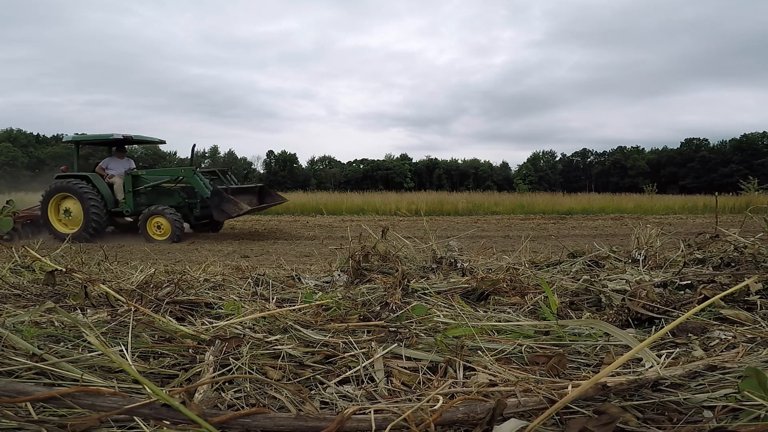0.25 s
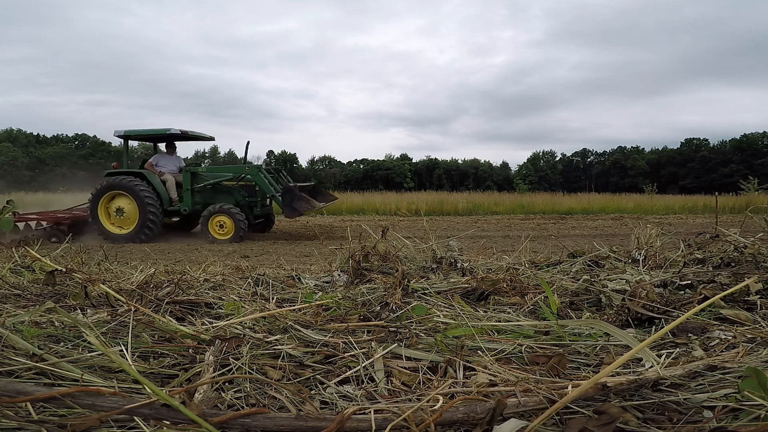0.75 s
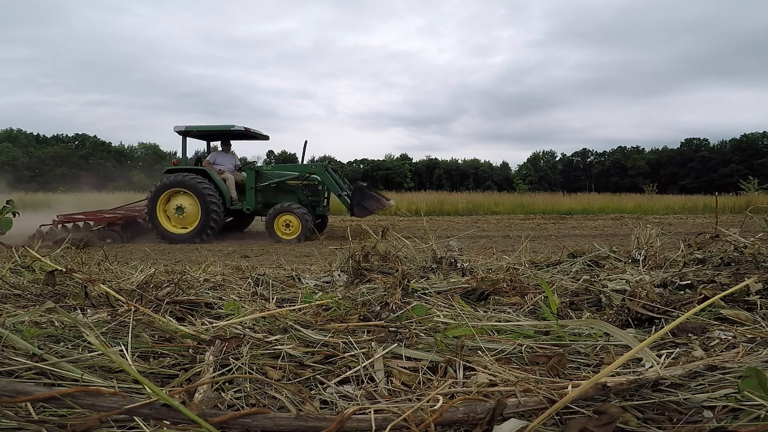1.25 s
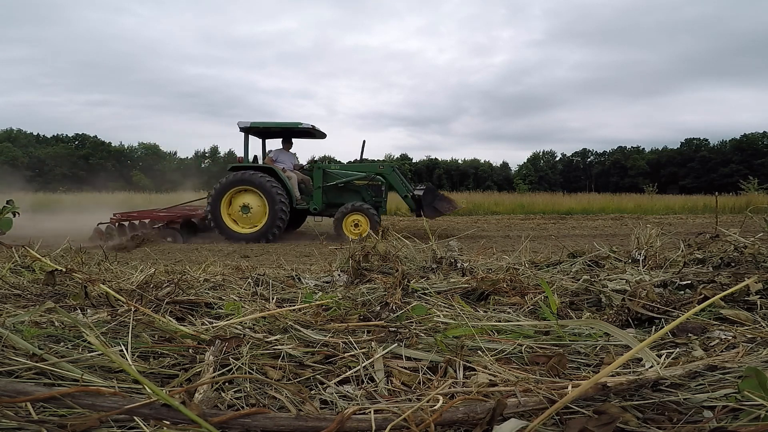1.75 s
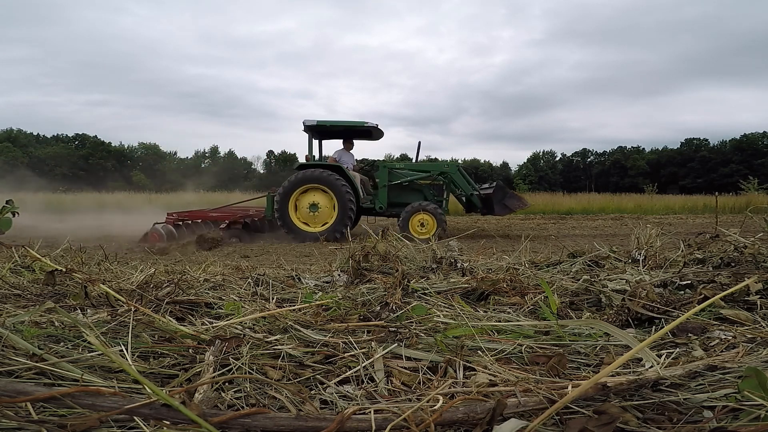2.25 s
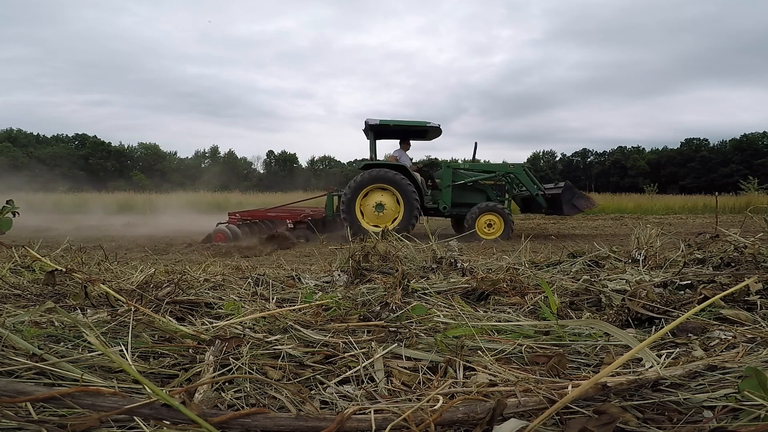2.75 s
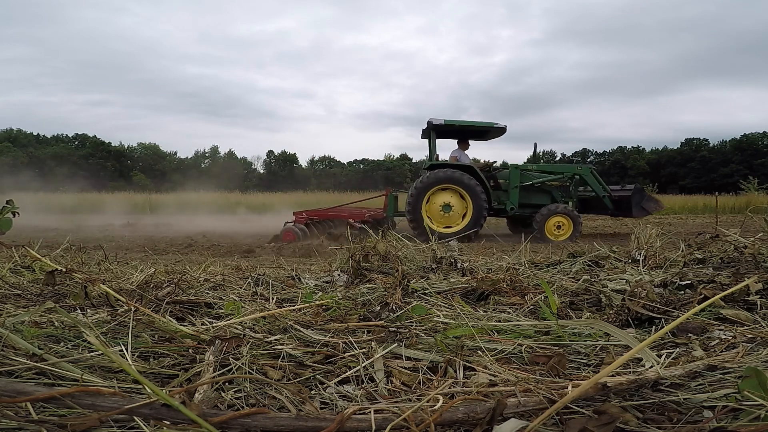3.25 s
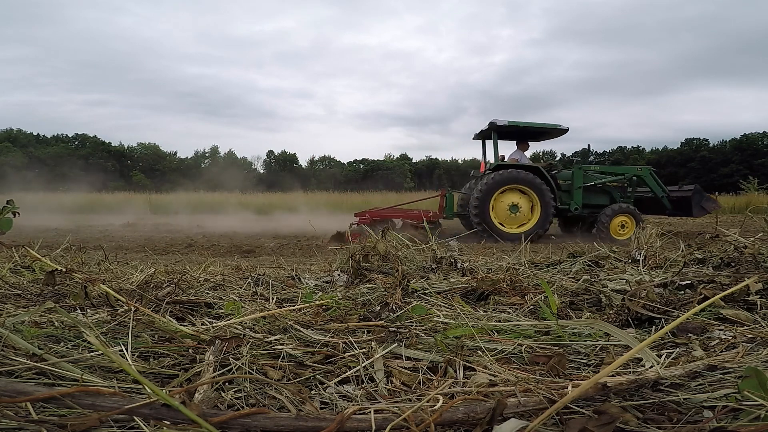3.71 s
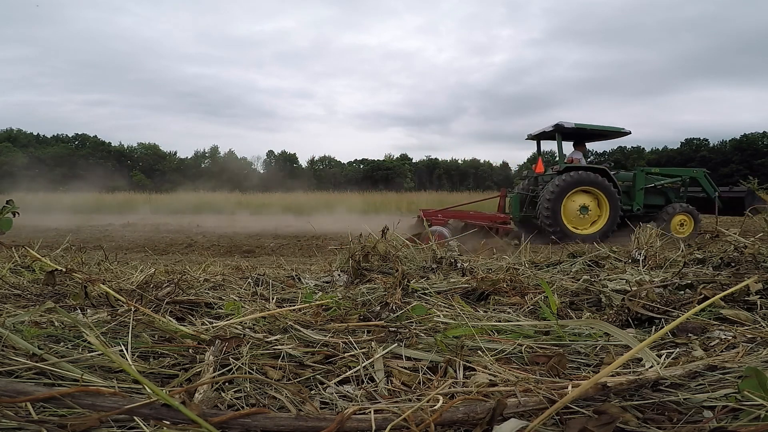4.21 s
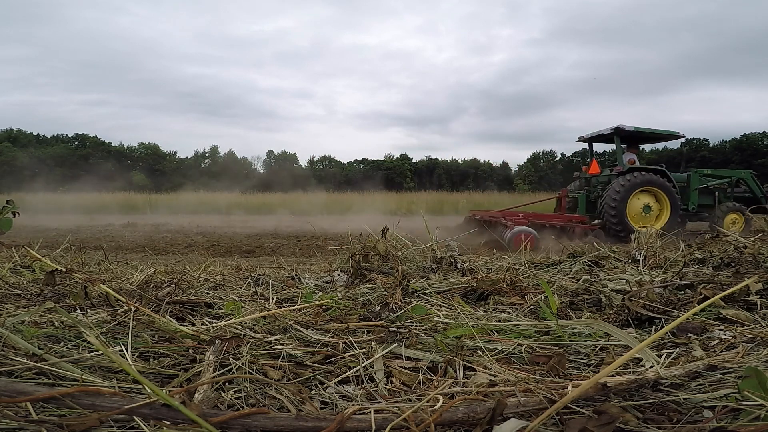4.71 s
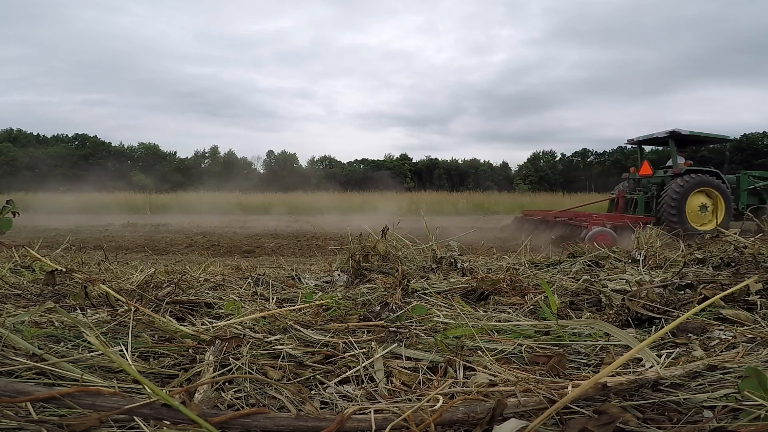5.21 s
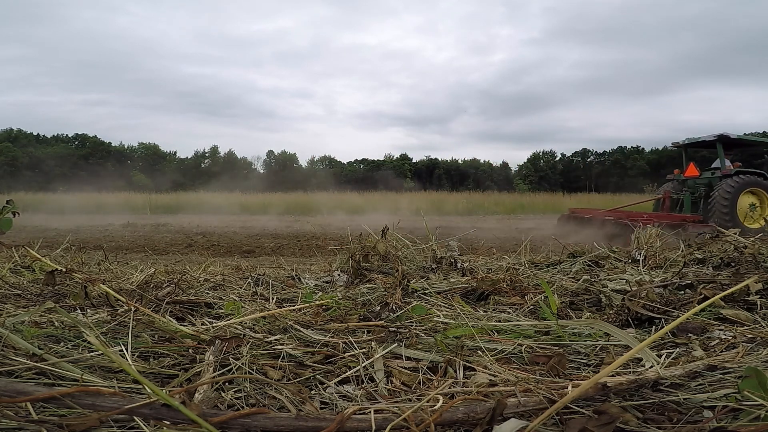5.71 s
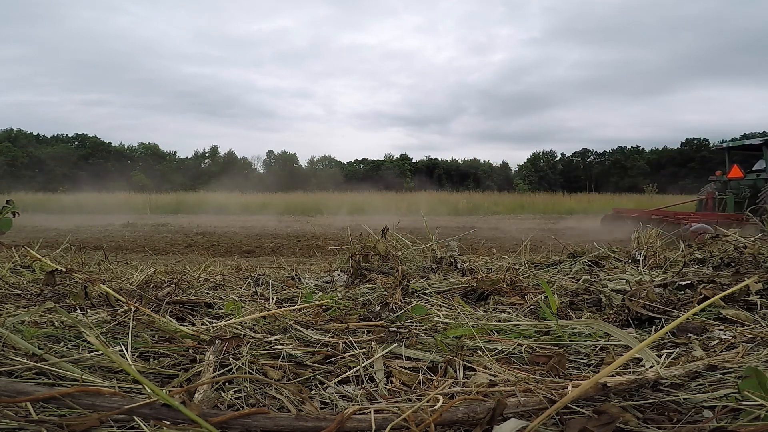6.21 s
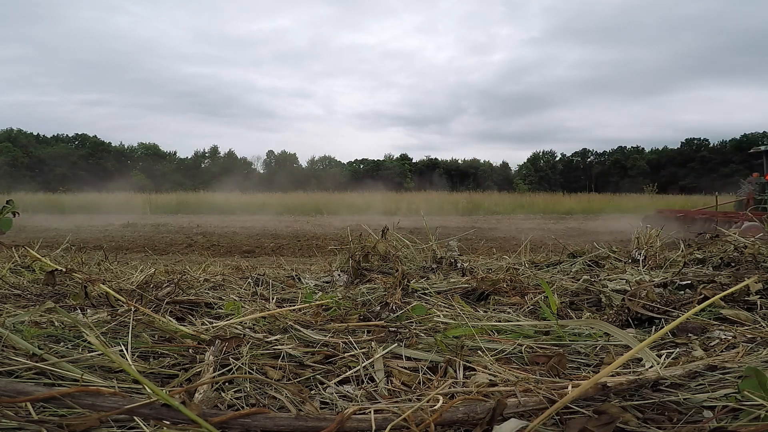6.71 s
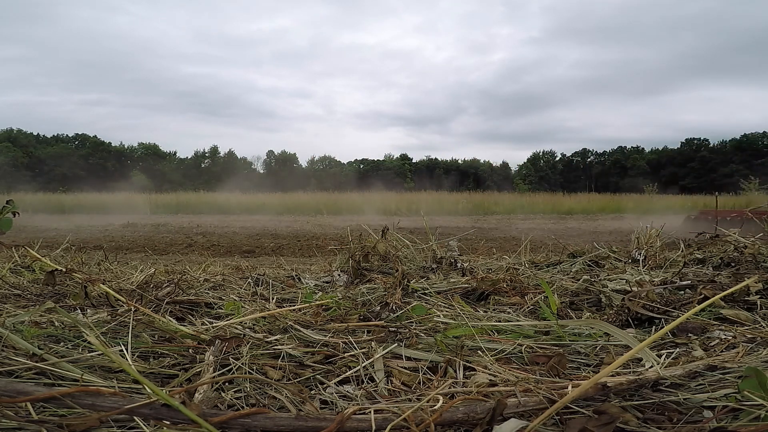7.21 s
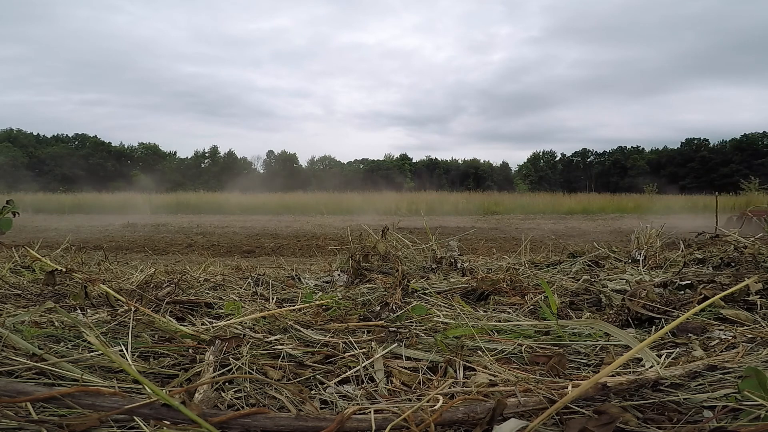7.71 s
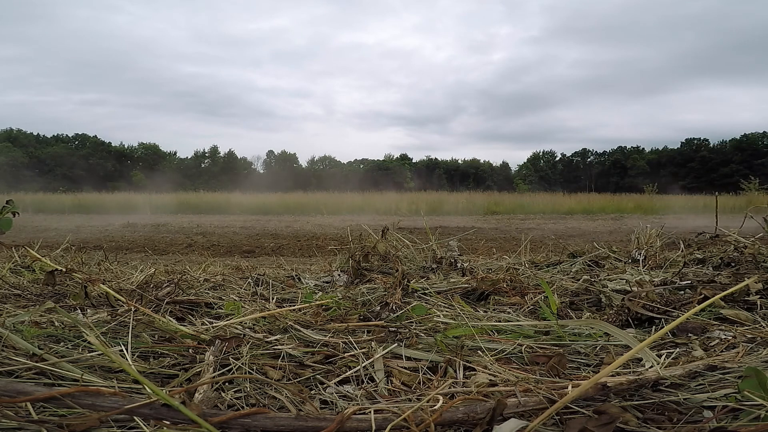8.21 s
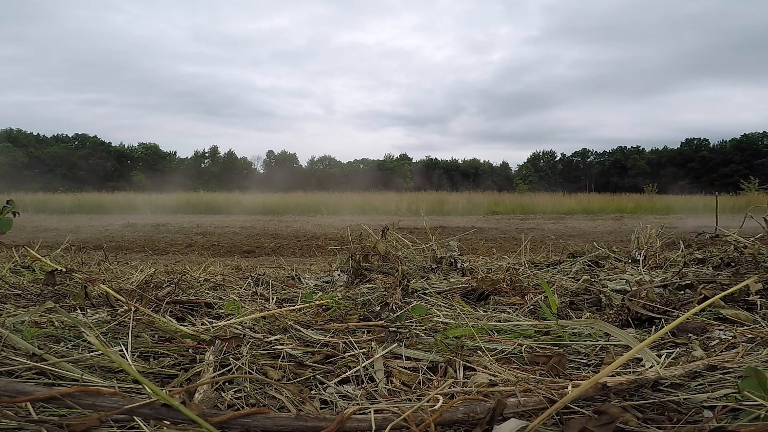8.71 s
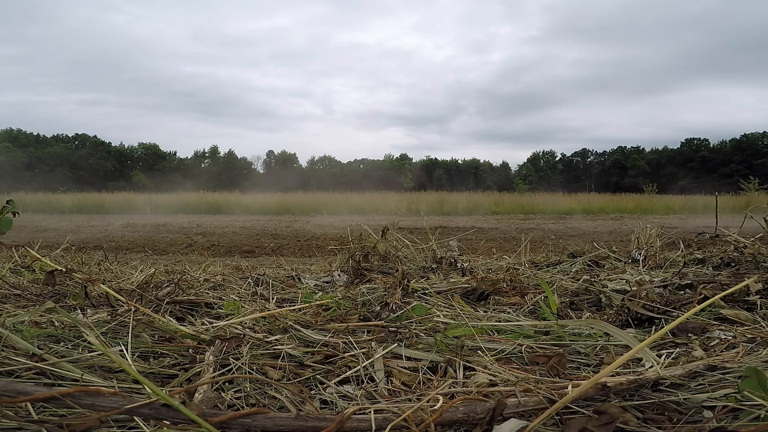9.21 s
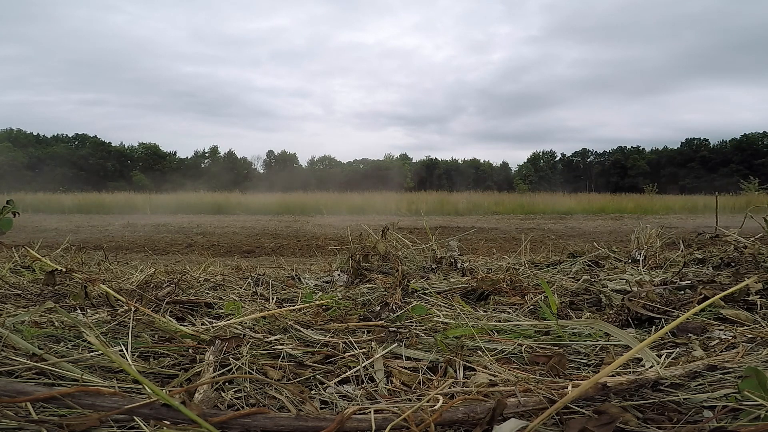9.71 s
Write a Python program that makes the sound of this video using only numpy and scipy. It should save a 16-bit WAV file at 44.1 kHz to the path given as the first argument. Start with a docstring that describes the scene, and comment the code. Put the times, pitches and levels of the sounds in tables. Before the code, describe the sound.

Close pass of a rattling four-cylinder tractor in an open field, gears whining, discs hissing, snapping stalks and squeaking as it drives away right.

```python
"""Tractor and disc harrow crossing a dry field

A four-cylinder diesel tractor passes from left to right and moves off, its pitch dropping a little.
The exhaust drones and throbs as sines locked to the engine cycle; noise in firing rhythm makes rumble,
growl, clatter and rasp. Gears whine as fluttering tones and loose steel guards ring when struck.
The discs hiss as a shower of random grains, snap stalks in short noise bursts and squeak in brief tones."""
import sys
import numpy as np
from scipy import signal
from scipy.fft import rfft, irfft, next_fast_len
from scipy.io import wavfile
from scipy.ndimage import uniform_filter1d, map_coordinates

SR = 44100
rng = np.random.default_rng(int(sys.argv[2]) if len(sys.argv) > 2 else 0)


def put_to_file(sound):
    """Save the sound as 16-bit audio at rate SR, in the file named by the first command-line argument."""
    columns = np.atleast_2d(sound).T  # one column per channel
    safe = np.clip(columns, -1, 1)
    whole_steps = np.round(safe * 32767)
    wavfile.write(sys.argv[1], SR, whole_steps.astype(np.int16))


N = 438779
T = np.arange(N) / SR   # time of every sample, seconds


def from_db(db):
    """Turn decibels into a gain."""
    return 10 ** (np.asarray(db) / 20)


def rms_one(x):
    """Scale to an average power of 1."""
    return x / np.sqrt(np.mean(x ** 2) + 1e-20)


def in_time(rows):
    """Draw straight lines through rows of (seconds, value), giving a value for every sample."""
    return np.interp(T, *np.transpose(rows))


def colour(x, spectrum):
    """Filter a sound by a table of (Hz, dB), then scale it to unit power."""
    hz, level_db = np.transpose(spectrum)
    size = next_fast_len(N)
    bins_hz = np.maximum(np.arange(size // 2 + 1) * SR / size, 1)
    bins_db = np.interp(np.log(bins_hz), np.log(hz), level_db,
                        left=level_db[0] - 24, right=level_db[-1] - 33)
    return rms_one(irfft(rfft(x, size) * from_db(bins_db), size)[..., :N])


def drift(rate_hz):
    """Random wander with a typical size of 1: smoothed noise, drawn every 100 samples."""
    step, settle = 100, 2000
    r = np.exp(-2 * np.pi * rate_hz * step / SR)
    noise = rng.standard_normal(N // step + settle + 2)
    slow = rms_one(signal.lfilter([1], [1, -2 * r, r * r], noise)[settle:])
    return np.interp(np.arange(N) / step, np.arange(len(slow)), slow)


def shift_late(x, samples):
    """Delay a sound by a changing number of samples (negative makes it early)."""
    return map_coordinates(x, [np.arange(N) - samples], order=3, mode="nearest")


def pan(balance_db):
    """Left and right gains that keep the total power; positive leans left."""
    gains = from_db(np.array([balance_db, -balance_db]) / 2).reshape(2, -1)
    return gains / np.sqrt(np.mean(gains ** 2, axis=0))


def place(x, balance_db, skew):
    """The microphone housing shades the port facing away; right of centre, left leads by skew samples/dB."""
    left = shift_late(x, skew * np.minimum(balance_db, 0))
    return np.array([left, x]) * pan(balance_db)


# the straight pass: when the engine is abreast, how near it comes, its speed, how far the harrow trails
ABREAST_S, DISTANCE_M, DRIVE_M_PER_S, TOW_M = 1.7, 9.5, 2.5, 0.33


def bearing(behind_m=0):
    """Angle in radians from the microphone to a point of the rig: 0 abreast, positive once past."""
    return np.arctan((DRIVE_M_PER_S * (T - ABREAST_S) - behind_m) / DISTANCE_M)


def passing(abreast_db, loss_db, behind_db=0):
    """Level in dB of a tractor part: loss_db per doubling of distance, behind_db gained from behind."""
    angle = bearing()
    return abreast_db + loss_db * np.log2(np.cos(angle)) + behind_db * np.sin(angle)


def tractor_balance():
    """Left-right balance in dB of the engine as it crosses."""
    return -0.49 * np.degrees(bearing()) - 1.8


# The discs bite and slow the engine.
# Each row: middle of the dip in seconds, drop in revolutions per minute, half length in seconds.
SAGS = [(0.103, 39.6, 0.072), (0.637, 33.9, 0.194), (1.1, 27.8, 0.154), (1.562, 27.6, 0.141),
        (2.249, 8.6, 0.237), (2.752, 38.8, 0.358), (3.604, 28.1, 0.292), (4.048, 54.4, 0.228),
        (4.692, 48.2, 0.37), (5.322, 59.4, 0.171), (5.786, 35.0, 0.373), (6.296, 42.6, 0.216),
        (6.828, 79.0, 0.153), (7.402, 72.8, 0.18), (8.109, 52.9, 0.205), (8.715, 83.0, 0.163),
        (9.22, 52.8, 0.155), (9.885, 15.1, 0.052)]


def sag():
    """Engine speed lost to the load, in revolutions per minute: one smooth dip for each bite."""
    return sum(drop * np.exp(-((T - s) / half_s) ** 2) for s, drop, half_s in SAGS)


CYLINDERS = 4   # each fires once in an engine cycle


def firing_surge(cycles):
    """Swing of the cylinder pressure: it rises fast at each firing, then dies away."""
    firing = 2 * np.pi * CYLINDERS * cycles
    return np.sin(firing) + 0.3 * np.sin(2 * firing) + 0.14 * np.sin(3 * firing)


# Hiss of the discs, with the amount of soil and stubble thrown.
# Each row: time in seconds, relative level in dB.
HISS_LEVEL = [(0.0, -36.5), (0.66, -38), (1.74, -40), (2.08, -34), (5.62, -35.5), (7.4, -42.5), (9.28, -47),
              (9.48, -43.5), (9.95, -49.5)]
# Colour of the hiss heard from in front. Each row: frequency in Hz, relative level in dB per Hz.
HISS_FRONT = [(2000, -1), (3900, 0.5), (4600, 9.5), (5300, 7.5), (5900, 4), (6550, -5.5), (7200, 8),
              (7800, 5.5), (8600, 2.5), (9500, -4), (10600, -6.5), (11600, -30), (13300, -17), (15000, -42)]
# Colour of the hiss heard from behind. Each row: frequency in Hz, relative level in dB per Hz.
HISS_BEHIND = [(2000, -56), (3900, 3), (4600, 5.5), (6200, -0.5), (7600, 9), (8600, -0.5), (9700, -10),
               (10900, -6.5), (12000, -19), (13800, -17), (15000, -36)]


def soil():
    """Crumbs and dry stubble rattle over the discs: clumped grains, heard directly and off the stubble."""
    rightward = np.sin(bearing(TOW_M))
    grains_per_s = 9000   # before clumping
    born = rng.random((3, N)) < grains_per_s / SR * from_db(2.4 * drift(25))
    size_db = 3.1 * np.minimum(rng.exponential(1, (3, N)), 5)
    grains = born * rng.choice([-1, 1], (3, N)) * from_db(size_db)
    turn_s, turn_width_s = 5.54, 0.87   # when and how gradually the rear colour takes over
    behind = (1 + np.tanh((T - turn_s) / turn_width_s)) / 2
    direct, *scattered = (1 - behind) * colour(grains, HISS_FRONT) + behind * colour(grains, HISS_BEHIND)
    left_lag_s = 0.000079 + 0.000022 * rightward
    left = shift_late(direct, left_lag_s * SR)
    both = np.array([left, direct]) + from_db(-4.5) * np.array(scattered)
    return from_db(in_time(HISS_LEVEL) + 5.5) * both * pan(1.3 - 2.0 * rightward)


def random_snaps(count):
    """Stalks snap at random from 3.6 s on, after the harrow has passed; rows as in LISTED_SNAPS."""
    from_s, greatest_db, range_db, crack_db = 3.6, 9, 9, -14   # levels against HISS_LEVEL; crack as table
    chance = rng.random((count, 2))
    s = from_s + chance[:, 0] * (T[-1] - from_s)
    db = np.interp(s, *np.transpose(HISS_LEVEL)) + greatest_db - range_db * chance[:, 1]
    return [(at, level_db, crack_db) for at, level_db in zip(s, db)]


# Listed snaps of stalks under the discs.
# Each row: time in seconds, relative level in dB, relative level in dB of the low crack against the burst.
LISTED_SNAPS = [(0.7894, -29, 3), (3.1477, -30, 4), (3.269, -24.5, -7), (4.2557, -22, -7),
                (4.338, -16.5, -3), (4.8602, -18, -7), (5.0519, -23, -10), (5.5453, -24, -6),
                (6.859, -30, -9), (7.378, -36.5, 1), (8.1753, -29, -31), (8.844, -28, -12),
                (9.3746, -27.5, -23), (9.4444, -25, -22), (9.5763, -27.5, -22)]
# Colour of splitting fibres. Each row: frequency in Hz, relative level in dB per Hz.
FIBRES = [(3000, -36), (4500, -31), (6200, -3), (7800, 10), (9500, -0.5), (11000, -3.5), (12500, -25),
          (15000, -17)]


def snaps():
    """A stalk breaks in a short noise burst of splitting fibres, with a lower crack of varying strength."""
    burst, crack, rise_s = np.zeros(N), np.zeros(N), 0.0048
    for s, db, low_db in list(LISTED_SNAPS) + random_snaps(count=10):
        age = np.clip((T - s + 0.002) / rise_s, 0, 50)   # starts 2 ms before the row's time
        shape = from_db(db - 3.5) * age * np.exp(1 - age)
        burst += shape
        crack += shape * from_db(low_db + 4.5)
    fibres = colour(rng.standard_normal((2, N)), FIBRES)
    low_band = signal.butter(2, [4400, 5900], "band", fs=SR, output="sos")
    low = rms_one(signal.sosfilt(low_band, rng.standard_normal((2, N))))
    crackle = rms_one(from_db(3 * drift(400)))   # uneven from one fibre to the next
    return (burst * fibres + crack * low) * crackle


# Disc bearings squeaking.
# Each row: start in seconds, pitch in Hz, relative level in dB, level of the octave in dB against the tone.
SQUEAKS = [(.31, 4180, -31, -19), (.785, 4960, -34, -30), (1.995, 4270, -42, -20), (2.328, 4200, -34, -10),
           (5.635, 9250, -35, -30), (5.718, 4194, -33, 7), (5.72, 9130, -39, -30), (5.93, 4260, -31, -11),
           (6.1, 9350, -40, -30), (6.172, 4250, -29.5, -10), (6.412, 4230, -45, -20),
           (7.162, 4320, -39.5, -20), (8.049, 4220, -40.5, -20)]


def squeaks():
    """Steel sticks and slips for a few hundredths of a second: a wavering tone and its octave."""
    out, length_s = np.zeros(N), 0.034
    t = np.arange(int(length_s * SR)) / SR
    fade = np.sin(np.pi * t / length_s) ** 2
    waver = drift(170)
    for s, hz, db, octave_db in SQUEAKS:
        span = int(s * SR) + np.arange(len(t))
        phase = 2 * np.pi * np.cumsum(hz * (1 + 0.004 * waver[span])) / SR
        tone = np.sin(phase) + from_db(octave_db) * np.sin(2 * phase)
        out[span] += from_db(db + 8.0) * fade * tone
    return out * pan(-8.5)


def ring(clicks, hz, t60_s):
    """A unit click sets off a sine of height 1 that dies by 60 dB in t60_s."""
    r, w = from_db(-60 / (t60_s * SR)), 2 * np.pi * hz / SR
    return signal.lfilter([0, np.sin(w)], [1, -2 * r * np.cos(w), r * r], clicks + 1e-18)


# Ringing tones of loose steel guards on the front of the tractor.
# Each row: pitch in Hz, relative level in dB, time in seconds to die away by 60 dB.
GUARDS = [(1177, -10, 0.073), (1602, 0, 0.054), (1820, -1, 0.044), (2150, 0, .035), (2372, -0.5, 0.06),
          (2600, -10, 0.089), (2960, -2, 0.056), (3350, -2, 0.033), (3567, 1, 0.039), (4190, -6, 0.076),
          (4520, -9, 0.063), (4610, -13, 0.066), (5060, -8.5, 0.062), (5510, -7.5, 0.046)]


def guards(cycles):
    """Loose steel, jolted once a cycle and chattering with the firings, rings at random strengths."""
    chatters_per_s, soft_hz = 220, 3900   # average rate; the jolt is too soft to ring tones above soft_hz
    knocks = np.flatnonzero(np.diff(np.floor(cycles + 0.5)))
    chatter_rate = chatters_per_s * (1 + np.sin(2 * np.pi * CYLINDERS * cycles))
    chatters = np.flatnonzero(rng.random(N) < chatter_rate / SR)
    knock_gain = from_db(passing(-30, loss_db=20, behind_db=-5))
    chatter_gain = from_db(passing(-36.5, loss_db=8.4, behind_db=-15))
    out = 0
    for hz, db, t60_s in GUARDS:
        clicks = np.zeros(N)
        clicks[chatters] = chatter_gain[chatters]
        clicks[knocks] += knock_gain[knocks] / np.hypot(1, (hz / soft_hz) ** 12)
        strength = rng.uniform(-1, 1, N)
        strength = strength + 0.5 * np.sign(strength)
        out = out + from_db(db) * ring(clicks * strength, hz, t60_s)
    return place(out, tractor_balance(), skew=0.075)


# The drive gear's whine, lying between the engine's lines. Each row: time in seconds, level in dB.
GEAR_LEVEL = [(0, -50), (1.5, -46), (2.5, -46), (3.8, -44), (4.35, -35), (4.8, -50), (5.55, -38),
              (6.3, -38), (7.3, -45.5), (8.5, -56), (9.9, -51.5)]
GEAR_MULTIPLE, SECOND_GEAR_MULTIPLE = 39.45, 44.45   # pitches as multiples of the engine cycle rate
# Whines of the timing gears and casing, each beamed to one side.
# Each row: multiple of the engine cycle rate, loudest time in seconds, spread in seconds,
# level in dB of the beam before pulsing.
WHINES = [(22, 0.3, 0.6, -40), (26, 0.9, 0.8, -39.5), (26, 3.0, 0.55, -36.5), (28, 5.9, 0.5, -45),
          (36, 4.4, 0.6, -47), (52, 2.6, 0.6, -41.5), (56, 5.65, 0.4, -43), (58, 8.4, 1.0, -46.5),
          (59, 0.3, 0.6, -41), (62, 8, 1.5, -51), (63, 1.4, 1, -39.5), (77, 3.1, 0.6, -33.5),
          (77, 8, 2, -51), (81, 1.2, 1, -44), (81, 3.4, 0.5, -41), (87, 0.6, 0.5, -40), (88, 1.5, 0.6, -41),
          (93, 4.3, 0.2, -34.5), (97, 2.6, 0.8, -41), (100, 0.65, 0.2, -35), (101, 0.7, 0.25, -35.5),
          (105, 0.65, 0.2, -36), (102, 2.2, 1, -44), (105, 1.5, 1, -40.5), (108, 3.6, 1, -43),
          (126, 3.9, 0.15, -38)]


def whine_tone(cycles, multiple):
    """A sine locked to the crankshaft, with wavering phase and a level that flutters more when high."""
    flutter_db = 1.3 * multiple / GEAR_MULTIPLE
    flutter = rms_one(from_db(flutter_db * drift(5.7)))
    phase = 2 * np.pi * (multiple * cycles + rng.random()) + 0.11 * drift(8.8)
    return np.sqrt(2) * flutter * np.sin(phase)


def whines(cycles):
    """Gear tones: timing whines pulse with the firings and swell in turn; drive gears sing through them."""
    spill = from_db(passing(-54, loss_db=4))   # heard outside the beam
    spill_top = 91   # multiple above which a whine hardly leaves its beam
    second_gain = from_db(passing(-49, loss_db=8, behind_db=5))
    out = from_db(in_time(GEAR_LEVEL)) * whine_tone(cycles, GEAR_MULTIPLE)
    out = out + second_gain * whine_tone(cycles, SECOND_GEAR_MULTIPLE)
    # from behind they beat once a cycle
    throb = 1 + 0.7 * np.maximum(np.sin(bearing()), 0) ** 2 * np.cos(2 * np.pi * cycles)
    pulse = throb * (1 + 0.28 * firing_surge(cycles))
    for multiple, loudest_s, spread_s, db in WHINES:
        beam = from_db(db) / np.hypot(1, ((T - loudest_s) / spread_s) ** 2)
        level = np.hypot(beam, spill / np.hypot(1, (multiple / spill_top) ** 4))
        out = out + level * pulse * whine_tone(cycles, multiple)
    return place(out, 0.7 * tractor_balance(), skew=0.3)


def knocking(cycles, repeat, depth):
    """Noise of contacts: a slowly changing share recurs each cycle, the rest is fresh; firings swell both."""
    size = 2048   # points in one cycle's pattern
    patterns = rng.standard_normal((4, size))
    same = sum(drift(0.6) * np.interp(cycles * size, np.arange(size), p, period=size) for p in patterns)
    same = same / np.sqrt(uniform_filter1d(same ** 2, size=SR // 5))   # even out its level
    contacts = np.sqrt(repeat) * same + np.sqrt(1 - repeat) * rng.standard_normal(N)
    return contacts * (1 + depth * firing_surge(cycles))


# Ringing panels of the block and bonnet.
# Each row: pitch in Hz, width in Hz, middle level in dB against the knocking.
PANELS = [(1090, 61, -16), (1370, 82, -9), (1680, 48, -9), (1835, 46, -7.5), (2070, 98, -14),
          (2370, 60, -20), (2937, 41, -6.5)]


def panels(x):
    """Thin steel picks out narrow bands of the knocking, each swelling and fading on its own."""
    out = x
    for hz, width_hz, db in PANELS:
        band = signal.lfilter(*signal.iirpeak(hz, hz / width_hz, fs=SR), x)
        out = out + from_db(db + 4.5 * drift(5.4)) * band
    return out


# Colours of the exhaust gas rumble, casing growl, combustion clatter and injector rasp.
# Each row: frequency in Hz, relative level in dB per Hz.
RUMBLE = [(12, -17), (25, -10), (45, -12), (70, -4.5), (120, -3.5), (175, -1), (250, -7), (350, -14.5),
          (500, -19.5), (700, -28), (1000, -43)]
GROWL = [(200, -11), (300, -2), (420, -2), (540, -2), (660, -10), (850, -6), (1200, -37)]
CLATTER = [(450, -18), (700, -12), (950, -7), (1150, -3), (1300, -6), (1600, -2), (1950, -1), (2400, -1),
           (2750, -4.5), (3150, -7), (3600, -11), (3900, -82), (6000, -23), (12000, -36)]
RASP = [(2000, -54), (3000, 2), (3700, 10), (4500, 5), (5400, -2.5), (6300, -1), (8000, -10), (14000, -47)]


def engine(cycles, sag_rpm):
    """Exhaust gas rumble, casing growl, clatter harder under load, and rasp; the field scatters a little."""
    balance_db = tractor_balance()
    clatter_db = passing(-23, loss_db=15, behind_db=3.74) + 0.0267 * sag_rpm   # dB per rpm of sag
    rumble = colour(knocking(cycles, repeat=0.1, depth=0.4), RUMBLE)
    rumble = from_db(passing(-22.5, loss_db=9.7, behind_db=2.5)) * rumble
    growl = colour(knocking(cycles, repeat=0.49, depth=0.25), GROWL)
    growl = from_db(passing(-35, loss_db=14.4, behind_db=7.6)) * growl
    clatter = colour(panels(knocking(cycles, repeat=0.55, depth=0.18)), CLATTER)
    clatter = from_db(clatter_db) * clatter
    rasp = colour(knocking(cycles, repeat=0.28, depth=0.34), RASP)
    rasp = from_db(passing(-35, loss_db=12, behind_db=-20.5)) * rasp
    scattered = from_db(clatter_db - 11.0) * colour(rng.standard_normal((2, N)), CLATTER)
    low = rumble * pan(-3.5) + growl * pan(-1.5 + 0.31 * balance_db)
    return low + place(clatter + rasp, balance_db, skew=0.08) + scattered


# Main exhaust lines; the rows are the firing tone, the throb of uneven cylinders and the fourth harmonic.
# Each row: level in dB abreast, loss in dB per doubling of distance, gain in dB from behind,
# gain in dB per revolution per minute of sag.
HARMONICS = [(-16, 3.5, 2.5, 0.0141), (-41.5, 14.5, 29.5, 0.0525), (-31.5, 20.5, 6.5, 0.021)]
# The firing tone's octave, strongest from in front. Each row: time in seconds, level in dB.
OCTAVE = [(0.1, -13.5), (2.34, -19), (3.84, -18), (4.06, -27), (4.3, -20.5), (6.13, -19.5), (9.82, -26.5),
          (9.9, -24)]
# The third harmonic, strongest after the tractor is abreast. Each row: time in seconds, level in dB.
THIRD = [(0, -36.5), (1.2, -31.5), (1.9, -36), (2.4, -26), (4.0, -24.5), (5.6, -32), (6.6, -33),
         (9.9, -45.5)]
# Weak exhaust lines between the firing harmonics.
# Each row: multiple of the engine cycle rate, level in dB against the firing tone before the pass alters it.
OVERTONES = [(3, -28), (5, -19.5), (9, -21.5), (11, -30), (15, -29.5), (19, -36), (20, -34.5), (22, -36.5),
             (24, -38), (28, -37), (36, -44)]


def exhaust(cycles, sag_rpm):
    """Firing pulses smoothed by the muffler, harder under load; unequal cylinders add lines between."""
    def line(db, order, flutter_db, wave=np.cos):
        """One sine at a multiple of the engine cycle rate, its level fluttering."""
        level = from_db(db + flutter_db * drift(6.7))
        return -np.sqrt(2) * wave(2 * np.pi * order * cycles) * level
    firing_db, throb_db, fourth_db = [passing(db, loss_db, behind_db) + load_db * sag_rpm
                                      for db, loss_db, behind_db, load_db in HARMONICS]
    drone = line(firing_db, order=4, flutter_db=0.3) + line(in_time(OCTAVE), order=8, flutter_db=1.0)
    throb = line(throb_db, order=7, flutter_db=1.5)   # beats against the octave once a cycle
    upper = -line(fourth_db, order=16, flutter_db=1.0) - line(in_time(THIRD), order=12, flutter_db=0.45)
    change_db = passing(0, loss_db=12, behind_db=7.3)   # for order 28, in proportion for the others
    between = sum(line(firing_db + db + change_db * order / 28, order, flutter_db=2.9, wave=np.sin)
                  for order, db in OVERTONES)
    return (drone + throb + upper + between) * pan(-1.27)


def scene():
    """The rig crosses the open field; one four-stroke cycle takes two turns of the crankshaft."""
    sag_rpm = sag()
    unloaded_rpm, sound_m_per_s = 2295, 343
    doppler = 1 - DRIVE_M_PER_S * np.sin(bearing()) / sound_m_per_s
    turns = np.cumsum((unloaded_rpm - sag_rpm) * doppler) / (60 * SR)
    cycles = turns / 2
    harrow = soil() + snaps() + squeaks()
    return harrow + guards(cycles) + whines(cycles) + engine(cycles, sag_rpm) + exhaust(cycles, sag_rpm)


def record(dry):
    """Round off the highest peaks, then cut the top steeply."""
    ceiling, cutoff_hz = 0.92, 14700
    rounded = dry / (1 + (dry / ceiling) ** 8) ** (1 / 8)
    return signal.sosfilt(signal.ellip(10, 0.1, 90, cutoff_hz, fs=SR, output="sos"), rounded)


dry = scene()
out = record(dry)
put_to_file(out)
```